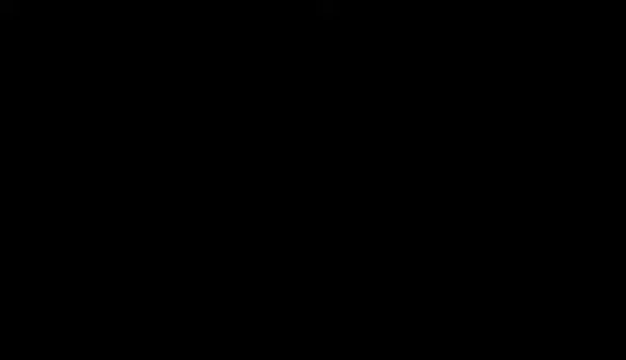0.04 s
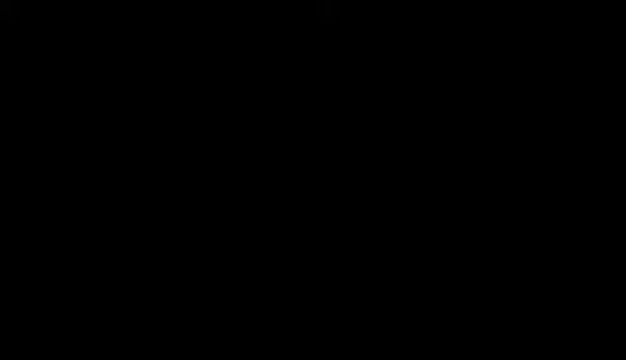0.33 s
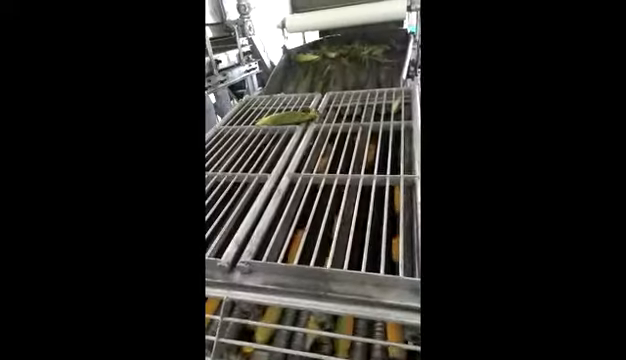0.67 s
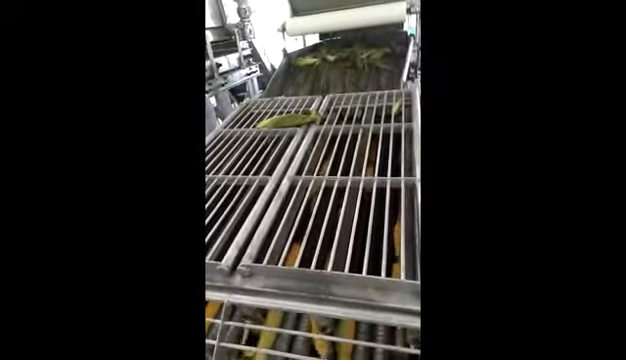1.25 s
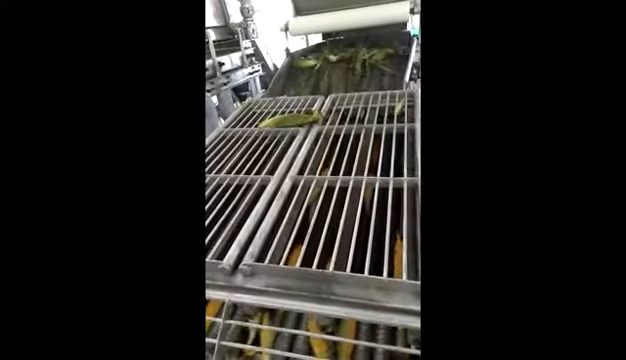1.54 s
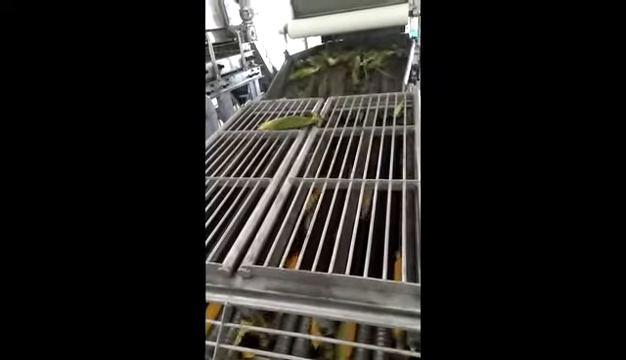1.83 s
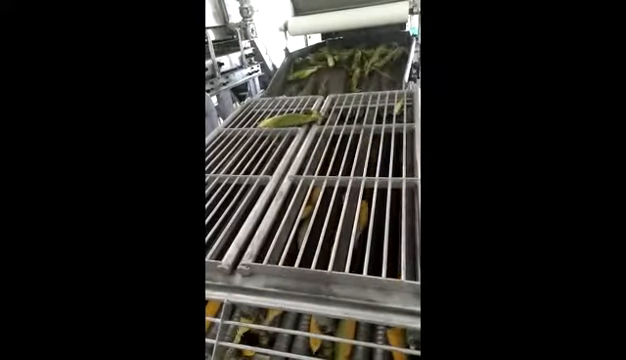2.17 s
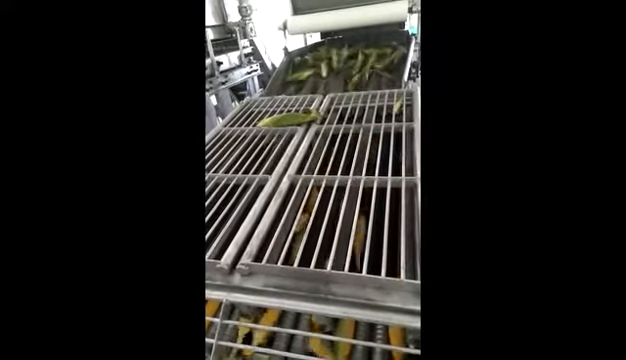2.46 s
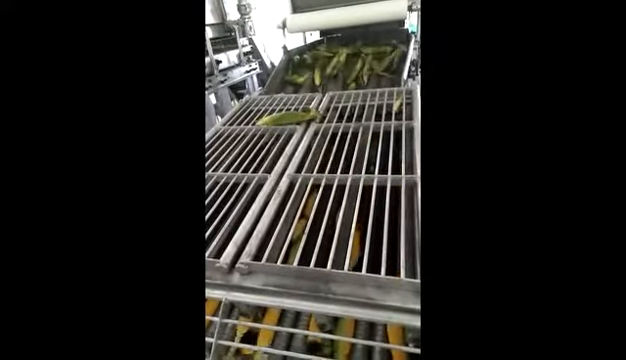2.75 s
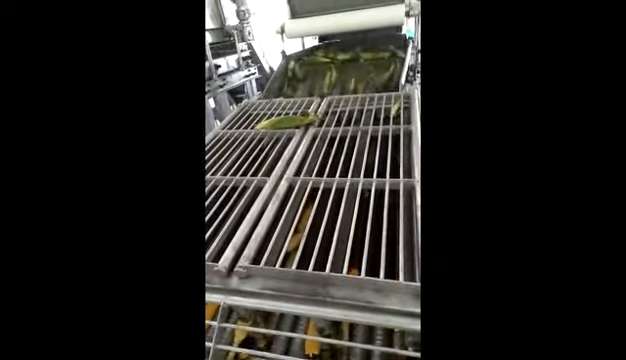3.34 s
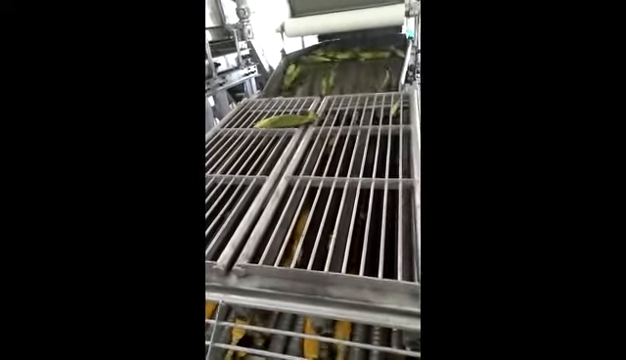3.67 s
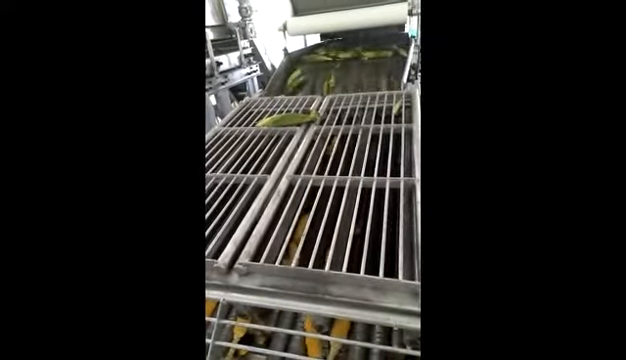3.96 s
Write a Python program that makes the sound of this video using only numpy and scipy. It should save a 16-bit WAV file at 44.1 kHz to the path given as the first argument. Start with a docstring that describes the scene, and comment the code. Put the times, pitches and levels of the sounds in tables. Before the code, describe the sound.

The rollers of a corn husker roar in a factory hall, heard from just above the grate. Ears knock and clank irregularly, husks crackle throughout and sometimes tear, and stalks snap, while the drive rumbles and faintly whines underneath.

```python
"""The spinning rollers of a corn husking machine roar with the load as ears tumble and knock on them.
The ears land with hollow thuds, clank on the steel bars and set the frame ringing.
Husks crackle all the time; now and then one is ripped off or a stalk snaps.
Underneath, the drive rumbles and whines. Heard in mono from just above the grate, in a factory hall."""
import sys
import numpy as np
from scipy import signal
from scipy.fft import rfft, irfft, next_fast_len
from scipy.io import wavfile
from scipy.ndimage import uniform_filter1d, map_coordinates

SR = 44100
rng = np.random.default_rng(int(sys.argv[2]) if len(sys.argv) > 2 else 0)


def dump_mix(stems):
    """Bounce the given channels to the path in sys.argv[1] as a 16-bit WAV at rate SR."""
    frames = np.atleast_2d(stems).T  # one column per channel
    limited = np.clip(frames, -1, 1)  # hard clip at full scale
    pcm = np.round(limited * 32767).astype(np.int16)
    wavfile.write(sys.argv[1], SR, pcm)


N = 176400


def amp(db):
    return 10 ** (np.asarray(db) / 20)


def unit(x):
    """x at rms 1."""
    return x / np.sqrt(np.mean(x ** 2) + 1e-20)


def along(points, hz):
    """Read (f/Hz, value) points at hz on a log frequency axis."""
    f, v = np.transpose(points)
    return np.interp(np.log(hz + 1), np.log(f + 1), v)


def clock():
    return np.arange(N) / SR


def curve(rows):
    """An automation curve through (t/s, value) rows."""
    return np.interp(clock(), *np.transpose(rows))


def wobble(rate):
    """A smooth random curve, rate knots a second."""
    return map_coordinates(rng.standard_normal(N // 20), [clock() * rate], mode="mirror")


def colour(x, spectrum):
    """x through a minimum-phase EQ of (f/Hz, level/dB) points, at rms 1."""
    m = 2 * next_fast_len(N // 2 + SR // 10)
    gain = amp(along(spectrum, np.fft.rfftfreq(m, 1 / SR)))
    cepstrum = irfft(np.log(gain), m)
    cepstrum[1:m // 2] *= 2  # folded forward, so nothing rings ahead of a hit
    cepstrum[m // 2 + 1:] = 0
    return unit(irfft(rfft(x, m) * np.exp(rfft(cepstrum)), m)[:N])


def noise(spectrum):
    return colour(rng.standard_normal(N), spectrum)


def impacts(rate, spread_db):
    """Random impulses, rate a second, of scattered size."""
    size = amp(spread_db * np.clip(rng.standard_normal(N), -2, 2))
    return (rng.random(N) < rate / SR) * size * np.sign(rng.standard_normal(N))


def patchy(x, depth_db):
    """x with drifting patches of random gain over time and frequency."""
    spectra = signal.stft(x, nperseg=256)[2]
    patches = uniform_filter1d(rng.standard_normal(spectra.shape), size=5, axis=0)
    patches = uniform_filter1d(patches, size=16, axis=1)
    return unit(signal.istft(spectra * amp(depth_db * unit(patches)))[1][:N])


def decay(t, t60):
    return np.exp(-np.log(1000) * t / t60)


def strike(start, rise_s, t60):
    """The envelope of a blow: fast attack, exponential tail."""
    t = np.maximum(clock() - start, 0)
    return (1 - np.exp(-t / rise_s)) * decay(t, t60)


def rings(hits, rise_s, t60, rough):
    """A short cluster of modes for each (t/s, level/dB, f/Hz) hit, roughened by phase jitter."""
    # modes of one hit: ratio to the pitch, level/dB
    partials = [(.76, -6), (1, -2.5), (1.27, -8)]
    t = clock()
    modes = [(ratio, amp(db), rough * wobble(90)) for ratio, db in partials]
    out = np.zeros(N)
    for start, db, hz in hits:
        phase = 2 * np.pi * hz * (t - start)
        tone = sum(gain * np.sin(ratio * phase + jitter) for ratio, gain, jitter in modes)
        out += amp(db) * strike(start, rise_s, t60) * tone
    return out


def hall(x, wet_db):
    """x plus the hall's diffuse reverb, whose treble dies a little sooner."""
    # reverb time: f/Hz, t60/s
    reverb_time = [(100, 0.43), (1000, 0.44), (8000, 0.36)]
    hz, t, spectra = signal.stft(rng.standard_normal(SR // 2), SR, nperseg=256)
    tail = signal.istft(spectra * decay(t, along(reverb_time, hz)[:, None]), SR)[1]
    return x + amp(wet_db) * signal.fftconvolve(x, tail / np.linalg.norm(tail))[:N]


def drive():
    """The drive lays down a fluttering rumble and, with its bearings, a few wavering whines."""
    # swells of the rumble: t/s, level/dB
    swells = [(.17, -36), (.32, -44.5), (.39, -25), (.56, -26), (.66, -32), (.93, -34), (1.06, -23.5),
              (1.35, -31), (2.05, -26), (2.45, -30), (2.87, -26), (3.05, -29.5), (4, -30)]
    # rumble spectrum: f/Hz, level/dB
    rumble_eq = [(20, -34), (38, -22.5), (50, -17), (65, -4.5), (88, 1), (125, 0.5), (170, -7), (400, -45),
                 (1500, -65)]
    # drive and bearing tones: f/Hz, level/dB, line width/Hz
    whines = [(419.4, -35.5, 12.15), (1100, -39, 9.1), (1590, -44, 12), (6490, -49.5, 31)]
    out = amp(curve(swells)) * noise(rumble_eq) * amp(wobble(22))
    for hz, db, width in whines:
        gain = amp(db + 0.85 * wobble(6.8))
        pitch = hz + width / 2 * wobble(30)
        out += gain * unit(np.sin(2 * np.pi * np.cumsum(pitch) / SR))
    return out


def husks(trim_db=-1.5, rustle_db=-1):
    """Husk fibres break in clumps over the rustle of leaves, with a shifting colour."""
    # crackle of husks in the rollers: t/s, level/dB
    swells = [(.17, -23.5), (.35, -25.5), (.62, -28), (.8, -26.5), (.98, -20), (1.15, -24), (1.33, -23),
              (1.47, -22.5), (1.62, -22.5), (1.92, -28.5), (2.04, -24), (2.18, -27), (2.33, -21),
              (2.7, -22), (2.85, -25), (3.12, -19.5), (3.33, -23.5), (3.63, -26.5), (3.98, -19.5)]
    # crackle spectrum: f/Hz, level/dB
    crackle_eq = [(300, -18.5), (1200, 0), (2300, 1.5), (3100, -4), (3800, 0.5), (4300, 2), (4750, 0),
                  (5200, -5), (5800, -2.5), (6400, -5), (7000, -5.5), (7600, -10.5), (9000, -25)]
    fibres = unit(impacts(rate=2200, spread_db=3.5) * amp(1.6 * wobble(110)))
    rustle = amp(rustle_db) * rng.standard_normal(N)
    crackle = patchy(colour(fibres + rustle, crackle_eq), depth_db=1.64)
    gain = amp(curve(swells) + trim_db + 0.91 * wobble(18))
    return hall(crackle * gain, wet_db=-10.5)


def rips(rise_s=.015):
    """A husk rips off in a quick run of tearing fibres that swells and dies away."""
    # rips: t/s, length/s, level/dB, hiss over the rasp/dB
    tears = [(.838, .035, -30, 4), (1.274, .042, -21, 3), (1.523, .052, -18.2, -1), (2.628, .05, -20.5, -5),
             (3.022, .095, -21.5, -3)]
    # rasp of the tear: f/Hz, level/dB
    rasp_eq = [(400, -18.5), (1500, -1), (2400, 4.5), (3100, -3), (4300, 6), (4900, 0.5), (5500, -17.5),
               (7600, -17.5), (9000, -33)]
    # hiss on top: f/Hz, level/dB
    hiss_eq = [(3000, -23.5), (5200, -18.5), (6000, -3), (6500, 0), (6900, -12.5), (7600, -12),
               (9000, -17.5)]
    rasp, hiss = (colour(impacts(rate=5100, spread_db=3.0), eq) for eq in (rasp_eq, hiss_eq))
    out = np.zeros(N)
    for start, length, db, hiss_db in tears:
        t = np.maximum(clock() - start, 0)
        envelope = np.minimum(t / rise_s, 1) * np.exp(-(t / length) ** 2)
        out += amp(db) * envelope * (rasp + amp(hiss_db) * hiss)
    return out


def snaps():
    """Stalks break with a short bright crack, each at its own pitch."""
    # breaking stalks: t/s, level/dB, peak f/Hz
    breaks = [(1.32, -14, 3860), (2.248, -10.5, 4470), (2.296, -8.5, 4480), (2.641, -10, 4950),
              (2.653, -17, 4600), (3.312, -15, 4370), (3.7465, -17, 4860)]
    # crack spectrum: ratio to the peak frequency, level/dB
    crack_eq = [(.11, -22.5), (.5, 1.5), (.87, -1.5), (1, 11), (1.14, -2), (2, -22)]
    out = np.zeros(N)
    for start, db, hz in breaks:
        crack = noise([(ratio * hz, level) for ratio, level in crack_eq])
        out += amp(db) * strike(start, rise_s=0.0018, t60=.032) * crack
    return hall(out, wet_db=-5)


def clanks():
    """Ears flung against the steel bars make them ring briefly."""
    # hits on the bars: t/s, level/dB, f/Hz
    hits = [(.863, -14, 938), (1.016, -14, 1097), (1.16, -13.5, 839), (1.395, -17, 805),
            (1.535, -16.5, 1583), (2.337, -17.5, 833), (3.028, -17.5, 817), (3.12, -14, 767),
            (3.882, -14, 1095)]
    return rings(hits, rise_s=0.0024, t60=0.18, rough=0.51)


def frame(blows):
    """The steel frame rings; every blow strikes each mode with a different strength."""
    # frame modes: f/Hz, level/dB, t60/s
    modes = [(254, -3.5, 0.36), (276.5, 2, 0.24), (304.3, 4, 0.3), (350, -2.5, 0.25), (426.2, 4, .2),
             (432.4, 0.5, 0.12), (574, 0, 0.094), (836, -4, 0.14), (940, -12, 0.12), (1082, -8, 0.083)]
    t = np.arange(SR // 2) / SR
    out = np.zeros(N)
    for hz, db, t60 in modes:
        force = blows * rng.standard_normal(N)
        ring = np.sin(2 * np.pi * hz * t) * decay(t, t60)
        out += amp(db) * unit(signal.fftconvolve(force, ring)[:N])
    return unit(out)


def thuds(rise_s=.005, ring_db=-4, shake_db=-16, shake_slope=1.82):
    """Each ear lands with a hollow knock; the heavier it is, the more the roller bed and frame shake."""
    # landing ears: t/s, level/dB, f/Hz
    landings = [(.164, -8.5, 428), (.205, -10, 275), (.629, -9, 428), (.857, -9, 307), (.93, -8.5, 417),
                (.972, -9.5, 314), (1.09, -10, 335), (1.26, -12, 252), (1.508, -8.5, 495), (1.6, -10, 380),
                (1.69, -9, 345), (1.762, -10, 347), (2.325, -12, 375), (2.48, -10, 265), (2.999, -5.5, 541),
                (3.123, -11, 325), (3.239, -8.5, 415), (3.895, -8.5, 360), (3.977, -10.5, 290)]
    # body of the roller bed: f/Hz, level/dB
    bed_eq = [(60, -32.5), (210, -11.5), (340, 0.5), (600, -2), (1000, -12), (6000, -44)]
    heaviest_db = max(db for _, db, _ in landings)
    shake = sum(amp(shake_db + shake_slope * (db - heaviest_db)) * strike(start, rise_s, t60=0.4)
                for start, db, _ in landings)
    bed = unit(noise(bed_eq) + amp(ring_db) * frame(rng.standard_normal(N)))
    return rings(landings, rise_s, t60=.17, rough=0.86) + shake * bed


def rollers(roar_db=-3.0, knock_db=-6.0, ring_db=-8.5, clatter_db=-9):
    """The rollers roar; ears knock on them, ring the frame and rattle the bars, all louder under load."""
    # load on the rollers: t/s, level/dB
    load = [(.17, -21.5), (.3, -19), (.44, -17), (.59, -19.5), (.74, -19), (.87, -16), (1.12, -17.5),
            (1.36, -17), (1.6, -17.5), (1.92, -18.5), (2.03, -17), (2.17, -19), (2.3, -17.5), (2.5, -15.5),
            (2.74, -16.5), (2.97, -16.5), (3.08, -16), (3.3, -18.5), (3.55, -18.5), (3.82, -19),
            (3.91, -17), (4, -18.5)]
    # roar of the rollers: f/Hz, level/dB
    roar_eq = [(40, -46.5), (100, -18), (170, -1), (400, -3), (520, -5.5), (680, -7), (830, -9), (1060, -6),
               (1250, -13.5), (1800, -18), (2500, -17), (3200, -25), (7500, -29)]
    # ears on the rollers: f/Hz, level/dB
    knock_eq = [(70, -40.5), (165, -1), (380, 4), (650, -5.5), (1000, -5), (1500, -5), (2400, -19.5),
                (4000, -29.5), (8000, -46)]
    # rattling bars: f/Hz, level/dB
    clatter_eq = [(500, -24), (800, 4), (1120, -2), (1900, -20.5)]
    blows = impacts(rate=340, spread_db=2.5)
    roar = amp(roar_db) * noise(roar_eq) * amp(0.57 * wobble(55))
    knocks = amp(knock_db) * unit(hall(colour(blows, knock_eq), wet_db=-4))
    rattles = colour(impacts(rate=45, spread_db=3.5), clatter_eq)
    clatter = amp(clatter_db) * unit(hall(rattles, wet_db=0.5))
    ring = amp(ring_db) * frame(blows)
    return amp(curve(load)) * (roar + knocks + ring + clatter)


def scene():
    """The whole machine, the same in both channels."""
    mono = rollers() + thuds() + clanks() + husks() + rips() + snaps() + drive()
    return np.array([mono, mono])


def record(dry, start_s=.163, fade_s=0.0037, ceiling=.75, top_hz=7600):
    """The sound cuts in abruptly, with its peaks soft-clipped and its top end cut off steeply."""
    gate = np.clip((clock() - start_s) / fade_s, 0, 1)
    clipped = dry / (1 + (dry / ceiling) ** 8) ** (1 / 8)
    m = next_fast_len(N + SR // 2)
    low_pass = 1 / (1 + (np.fft.rfftfreq(m, 1 / SR) / top_hz) ** 300)
    return irfft(rfft(clipped * gate, m) * low_pass, m)[:, :N]


dry = scene()
out = record(dry)
dump_mix(out)
```